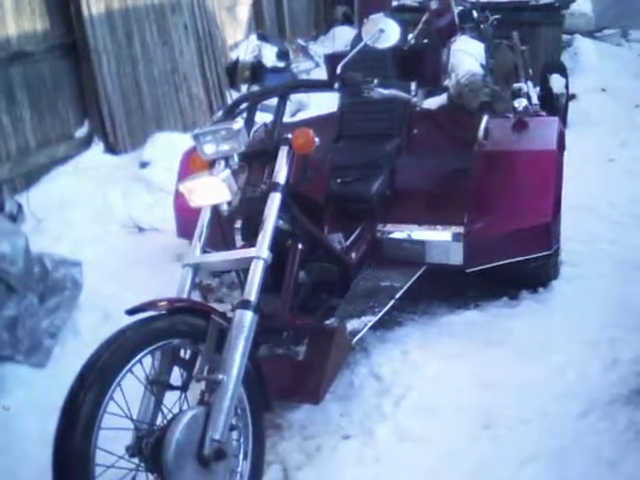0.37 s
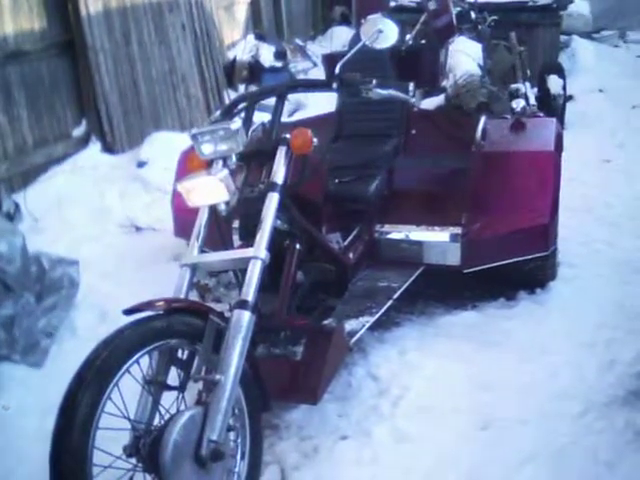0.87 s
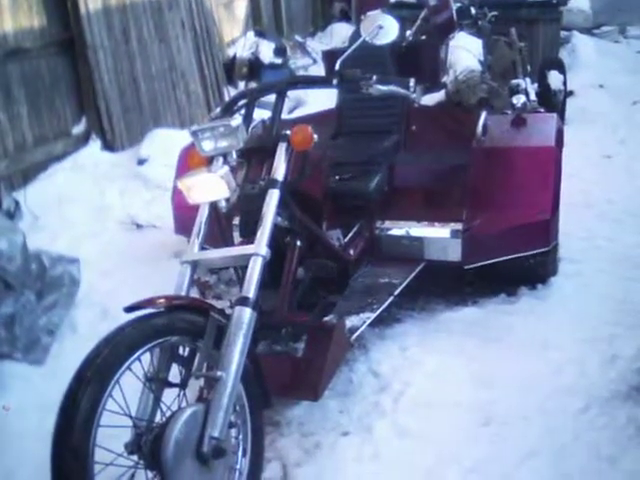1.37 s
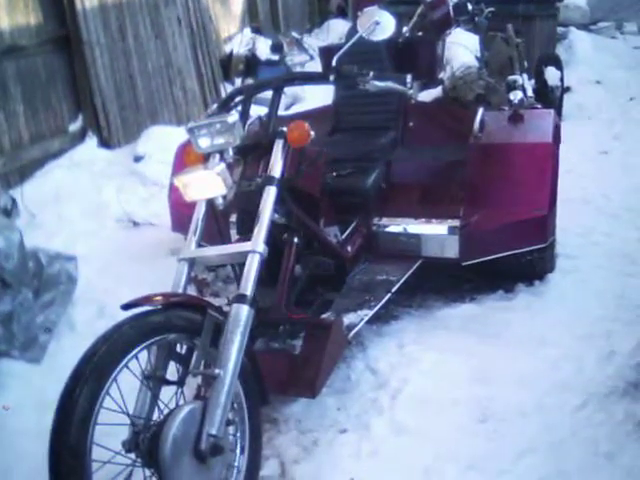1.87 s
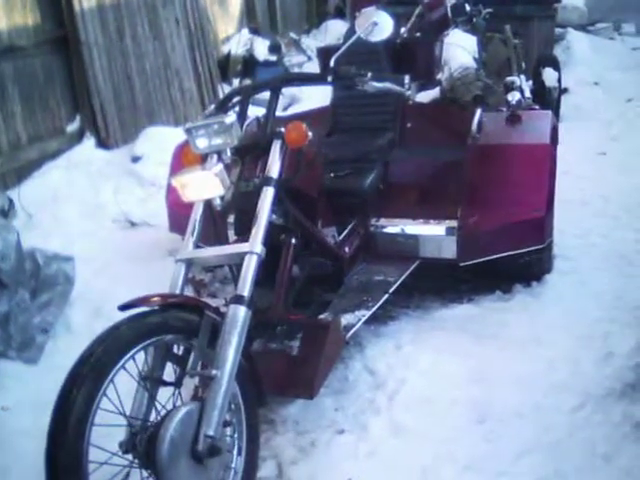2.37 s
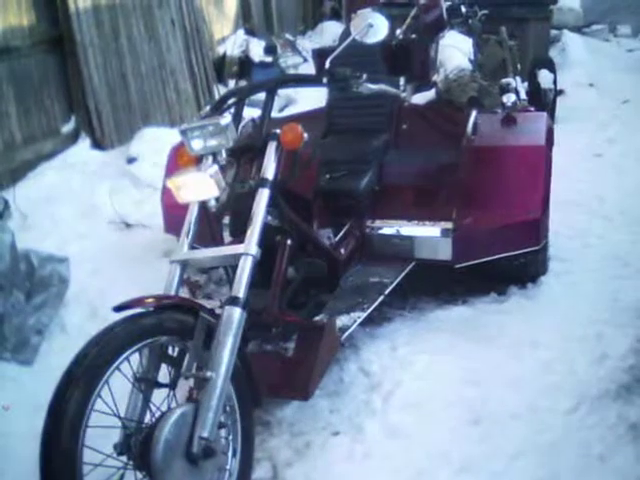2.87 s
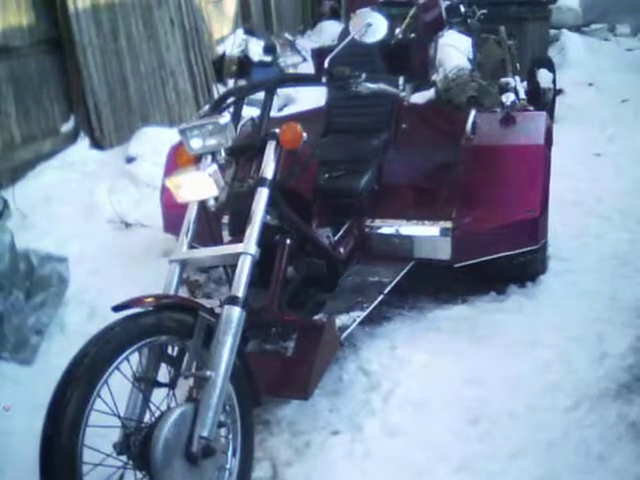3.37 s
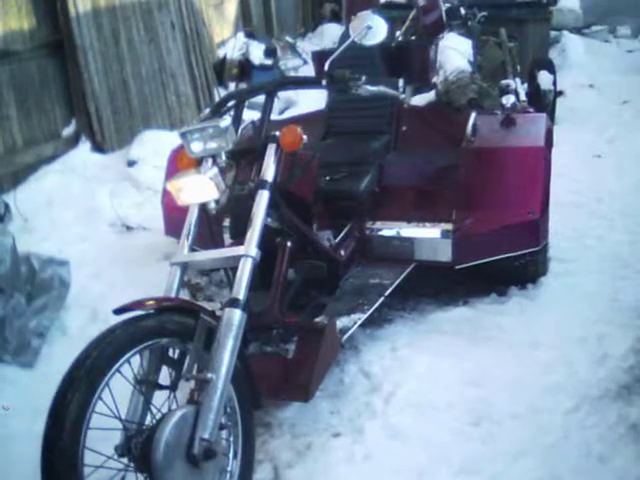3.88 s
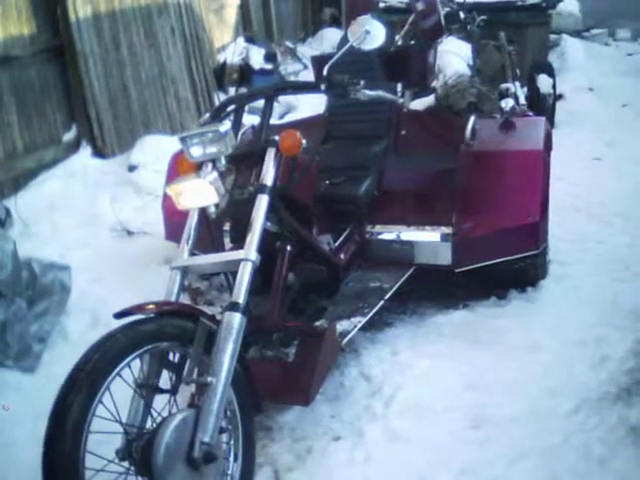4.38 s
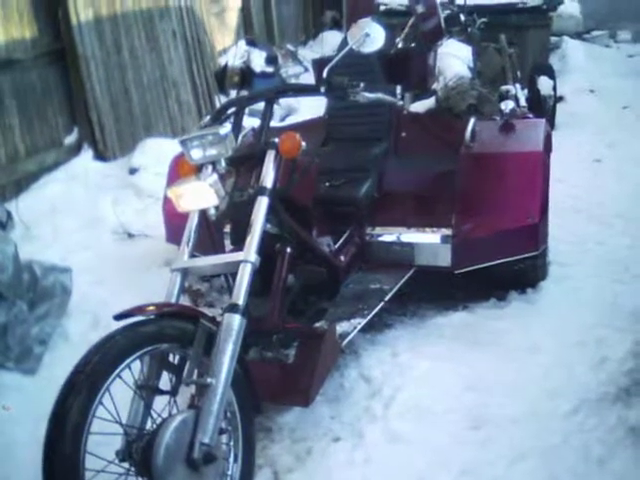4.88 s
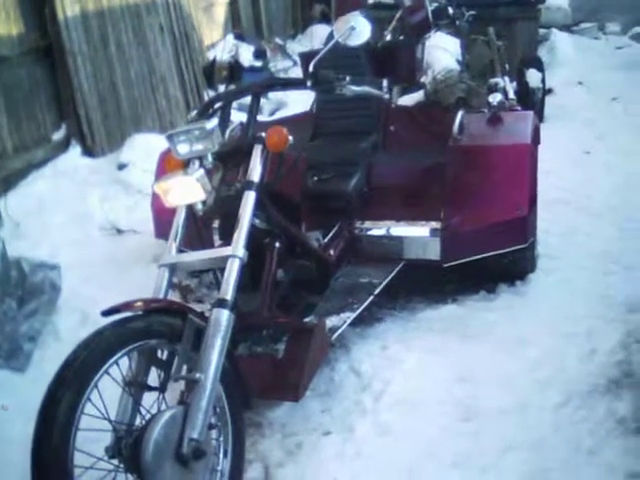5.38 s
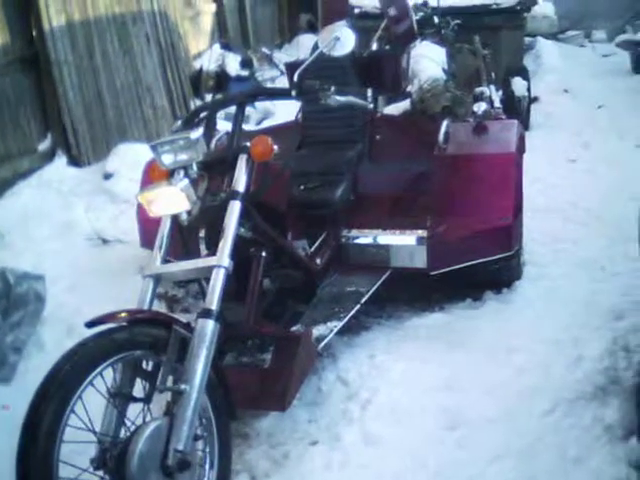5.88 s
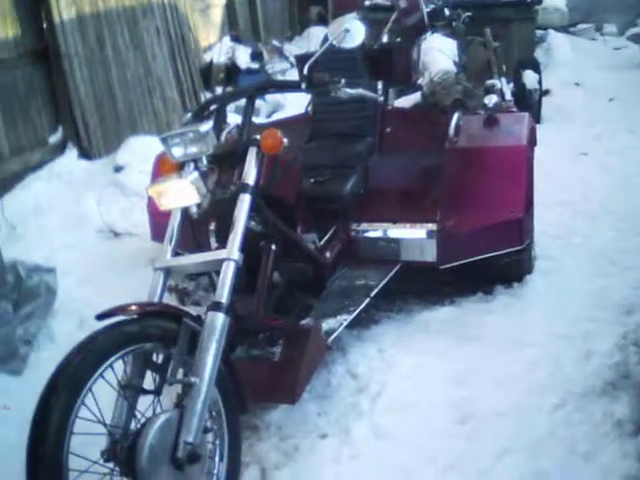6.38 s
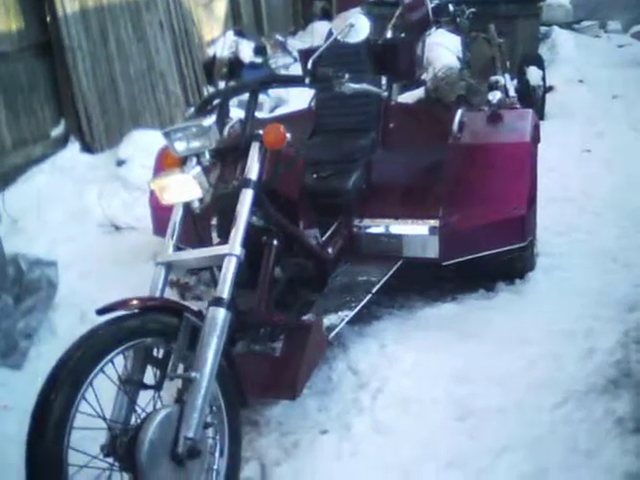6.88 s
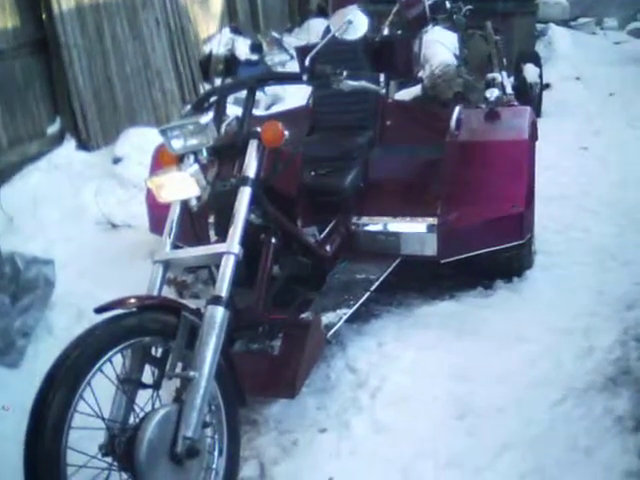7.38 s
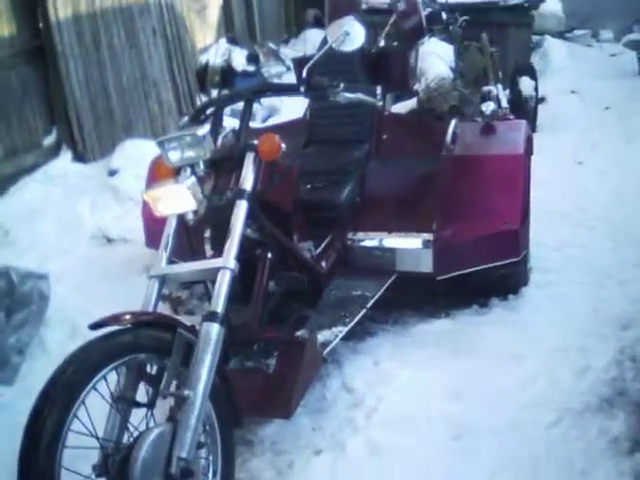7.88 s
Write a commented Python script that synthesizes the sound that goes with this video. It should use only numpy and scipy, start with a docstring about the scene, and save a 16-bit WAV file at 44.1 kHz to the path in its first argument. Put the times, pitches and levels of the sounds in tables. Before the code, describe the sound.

Deep even idle hum of a parked motor trike, ticking and hissing close by, with one brief handling bump and squeak.

```python
"""A four-cylinder air-cooled engine idles from the start in a snowy yard, steps from a handheld camera.
Exhaust tones on shaft orders and noisy thumps of uneven firing sag from a 63 Hz hum to about 57 Hz by 2.3 s.
Valve ticks and rubbing ring the block, hiss swells with each firing, thin tones hold steady throughout.
Hard firings ring the silencer from 1.9 to 6.9 s. Near 3.2 s a finger squeaks and the grip jolts the camera.
The hum climbs to 61 Hz by 6.1 s and sags again; a faint jolt follows at 7.8 s."""
import sys
import numpy as np
from scipy import signal
from scipy.io import wavfile
from scipy.ndimage import uniform_filter1d

SR = 44100
rng = np.random.default_rng(int(sys.argv[2]) if len(sys.argv) > 2 else 0)


def to_linear_factor(level_db):
    """Convert decibel levels (scalar or array-like) to linear amplitude factors."""
    exponent = np.asarray(level_db, float) / 20
    return 10 ** exponent


def store_pcm(level_fs):
    """Save levels as 16-bit WAV."""
    pcm = np.round(np.clip(level_fs, -1, 1) * 32767).astype(np.int16)
    wavfile.write(sys.argv[1], SR, np.atleast_2d(pcm).T)


N = 363384
T = np.arange(N) / SR  # s
MID_HZ = 59  # hum at which the speed-dependent levels hold


def evened(x):
    """Scales to rms 1."""
    return x / np.sqrt(np.mean(x ** 2) + 1e-20)


def coloured(x, points):
    """Causal minimum-phase filter through points of (Hz, dB): the phase follows from the log gain."""
    point_hz, point_db = np.transpose(points)
    bin_hz = abs(np.fft.fftfreq(2 ** 15, 1 / SR))
    gain_db = np.interp(np.log(bin_hz + 1), np.log(point_hz + 1), point_db)
    log_gain = np.log(to_linear_factor(gain_db))
    response = np.exp(np.conj(signal.hilbert(log_gain)))
    taps = np.fft.ifft(response).real[:2 ** 14]
    return signal.oaconvolve(x, taps)[:len(x)]


def resonate(x, hz, width_hz):
    """Resonance of peak gain 1: shifts hz down to zero, smooths with one pole, shifts back."""
    carrier = np.exp(2j * np.pi * np.cumsum(hz * np.ones(len(x))) / SR)
    pole = np.exp(-np.pi * width_hz / SR)
    return 2 * (carrier * signal.lfilter([1 - pole], [1, -pole], x / carrier)).real


def resonate_twice(x, hz, width_hz):
    """Two equal resonances in series: steeper skirts, slower onset."""
    return resonate(resonate(x, hz, width_hz), hz, width_hz)


def waver(points_per_s):
    """Slow random curve of rms 1: straight lines between normal draws."""
    count = round(T[-1] * 200)
    return evened(np.interp(T * points_per_s, np.arange(count), rng.standard_normal(count)))


# Idle speed. Each row: time in seconds, hum in Hz (four times the shaft speed).
IDLE_SPEED = [(0.0, 63.0), (0.3, 62.08), (0.6, 60.3), (0.9, 59.79), (1.3, 60.09), (1.9, 59.29), (2.3, 56.6),
              (2.6, 57.43), (3.2, 56.47), (3.45, 58.84), (3.8, 57.71), (4.1, 57.95), (4.6, 58.27),
              (5.2, 60.13), (5.7, 60.85), (6.1, 61.22), (6.5, 61.23), (7.05, 58.57), (7.6, 59.23),
              (8.24, 58.85)]


def hum_hz():
    """Hum frequency over time, four cycles per shaft turn."""
    return np.interp(T, *np.transpose(IDLE_SPEED))


# Hum level. Each row: time in seconds, level in dB.
HUM_LEVEL = [(0, -27.5), (.5, -27), (1.1, -28), (2, -27), (3.3, -29), (4, -28), (5.5, -28), (6.9, -27),
             (7.5, -29), (8.24, -28)]
# Much harder or weaker burns. Each row: centre in seconds, lift or drop of the hum in dB.
ODD_BURNS = [(.22, 3.8), (.42, 2.8), (.48, 2.8), (.54, 3.4), (.81, 3.3), (1.21, 3.1), (1.42, 2.5),
             (1.55, 2.8), (1.95, 2.5), (2.13, 3), (2.27, -4), (2.35, -5), (2.49, -5.7), (2.72, 3.4),
             (2.77, -5.6), (2.91, -4.7), (3.1, 3.6), (3.33, -4.3), (3.55, 3.5), (3.63, 3.3), (3.81, -5.9),
             (4.07, 3.6), (4.59, 3.6), (4.64, -5.3), (5.07, -9), (5.66, 3.6), (5.83, 3.3), (5.99, 3.5),
             (6.25, 4.1), (6.7, 3.3), (6.88, 3.9), (7.11, 3.2), (7.19, 3.2), (7.46, -8.3), (7.87, 3.6),
             (7.96, 3.8)]
# Weaker exhaust orders. Each row: multiple of the hum, level in dB re mean hum, polarity +-1.
WEAK_ORDERS = [(.75, -25, -1), (1.25, -24, 1), (1.5, -23, -1), (1.75, -24, -1), (2.25, -31, 1),
               (2.75, -20, 1), (3.25, -23, 1), (3.5, -31, -1), (3.75, -27, -1), (4, -29, -1),
               (4.5, -28, -1), (5, -38, -1), (5.5, -42, 1), (7, -42, -1)]
BURN_S = .02  # from centre to 1/e
OCTAVE_DB, OCTAVE_DB_PER_HZ = -41.5, -.6  # at MID_HZ, slope per Hz of hum
TENTH_DB, TENTH_DB_PER_HZ = -39.8, .3


def exhaust(shaft):
    """Sines on shaft orders; all but hum and octave leave the pipe shifted by a fifth of a cycle."""
    def tone(multiple, shift):
        return np.sqrt(2) * np.cos(2 * np.pi * (4 * multiple * shaft + shift))

    hum_db = np.interp(T, *np.transpose(HUM_LEVEL))
    burn_db = sum(db * np.exp(-((T - s) / BURN_S) ** 2) for s, db in ODD_BURNS)
    fast_hz = hum_hz() - MID_HZ
    out = to_linear_factor(hum_db + burn_db) * tone(1, 0)
    out += to_linear_factor(OCTAVE_DB + OCTAVE_DB_PER_HZ * fast_hz + 1.1 * waver(15)) * tone(2, 0)
    out += to_linear_factor(TENTH_DB + TENTH_DB_PER_HZ * fast_hz + 1.1 * waver(17)) * tone(5 / 2, 1 / 5)
    for multiple, db, polarity in WEAK_ORDERS:
        level = to_linear_factor(np.mean(hum_db) + db + 0.47 * waver(9))
        out += polarity * level * tone(multiple, 1 / 5)
    return out


def firings(shaft, decay):
    """Decaying puff at each firing, two a turn, of random strength; decay in firing intervals."""
    strength_db = 2.0 * rng.standard_normal(400) + np.resize([1.5, -1.5], 400)
    strength = to_linear_factor(strength_db)[(2 * shaft).astype(int)]
    return strength * np.exp(-(2 * shaft % 1) / decay)


# Uneven firings. Each row: share of the turn, spread of the thump in dB, relative.
UNEVEN_FIRINGS = [(.3, -2), (0.801, -17)]
# Rumble filter. Each row: frequency in Hz, density in dB per Hz, relative.
RUMBLE_COLOUR = [(5, -9), (12, -3), (28, -4.5), (45, -2.5), (72, 1), (100, -11.5), (130, -9), (165, -2.5),
                 (230, -4.5), (290, -14), (330, -15), (420, -18.5), (600, -24.5), (1000, -24.5),
                 (2000, -61.5)]
RUMBLE_DB, RUMBLE_DB_PER_HZ = -39, -.4  # at MID_HZ; firings get more uneven as the speed sags


def rumble(shaft):
    """Each firing burns harder or softer than the mean: a thump of either sign, over gas noise."""
    thumps = np.zeros(N)
    for share, db in UNEVEN_FIRINGS:
        at = np.flatnonzero(np.diff(np.floor(shaft - share)))
        thumps[at] += to_linear_factor(db) * rng.standard_normal(200)[:len(at)]
    silencer = signal.butter(2, 300, fs=SR, output="sos")  # rounds the thumps off
    thumps = signal.sosfilt(silencer, thumps)
    gas = (0.024 + 0.016 * firings(shaft + 0.041, 0.31)) * rng.standard_normal(N)
    level_db = RUMBLE_DB + RUMBLE_DB_PER_HZ * (hum_hz() - MID_HZ)
    return to_linear_factor(level_db) * evened(coloured(thumps + gas, RUMBLE_COLOUR))


# Single hard firings. Each row: time in seconds, peak in dB.
HARD_FIRINGS = [(1.865, -31), (2.83, -27), (3.246, -30), (4.001, -29), (4.739, -36), (5.547, -32.5),
                (6.925, -33)]


def pops():
    """A hard firing kicks the silencer, which rings at 185 Hz for a few cycles."""
    kicks = np.zeros(N)
    for s, db in HARD_FIRINGS:
        kicks[round(s * SR)] = to_linear_factor(db)
    ring = resonate_twice(kicks, 185, 65)
    return ring * kicks.max() / abs(ring).max()


# Valve ticks. Each row: share of the shaft turn, mean strength in dB, relative.
VALVE_TICKS = [(.16, -2), (.42, -17), (.49, -1.5), (0.622, 1), (0.842, -5), (0.981, -9)]
# Modes of block and tinware. Each row: frequency in Hz, width per pass in Hz, level in dB, relative.
BLOCK_MODES = [(499, 117, -4), (701, 81, -8), (793, 58, -0.5), (864.5, 60, 1.5), (929.5, 23, -1.5),
               (967, 55, -2), (1133, 45, -6.5), (1219, 85, -8), (1428, 225, -7), (2110, 90, -18),
               (2350, 98, -7), (2554, 110, -10.5), (2692, 65, -14), (2820, 140, -15), (4434, 350, -17),
               (9100, 790, -24)]
BLOCK_DB = -53.5  # rms, before the treble curve


def block(shaft):
    """Valve ticks (a sharp blow and a short rattle) and steady rubbing ring the metal."""
    beat, blows = 1.18 * np.ones(N), np.zeros(N)
    for share, db in VALVE_TICKS:
        turns = shaft - share + 1
        size = to_linear_factor(db + 1.8 * rng.standard_normal(200))[turns.astype(int)]
        beat += size * np.exp(-(turns % 1) / .04)
        blows[1:] += 15 * size[1:] * np.diff(np.floor(turns))
    drive = beat * rng.standard_normal(N) + uniform_filter1d(blows, 12)
    ring = np.zeros(N)
    for k, (hz, width_hz, db) in enumerate(BLOCK_MODES):
        level = to_linear_factor(db + .5 * waver(2.82))
        ring += (-1) ** k * level * resonate_twice(drive, hz, width_hz)  # neighbours in opposite sign
    return to_linear_factor(BLOCK_DB) * evened(ring)


# Hiss filter. Each row: frequency in Hz, density in dB per Hz, relative.
HISS_COLOUR = [(590, -28.5), (1000, -8), (1120, -8), (1490, -6), (1810, -9.5), (2210, -10.5), (2430, -8.5),
               (2780, -13.5), (3120, -14), (4490, -14.5), (4930, -14), (5950, -11), (8930, -12.5),
               (11000, -26), (12100, -54), (15700, -78), (22000, -120)]
HISS_DB = -56.5  # rms, before the treble curve


def hiss(shaft):
    """Cooling air and intake: filtered noise that swells with each firing."""
    swell = uniform_filter1d(firings(shaft + 0.11, 0.41), 60)
    drive = (1.8 + swell) * to_linear_factor(.5 * waver(3.6)) * rng.standard_normal(N)
    return to_linear_factor(HISS_DB) * evened(coloured(drive, HISS_COLOUR))


# Treble level. Each row: time in seconds, gain in dB.
TREBLE_LEVEL = [(0, .6), (1.5, .8), (2.5, -.9), (3.5, 0), (6, .5), (7.3, -.4), (8.24, .5)]


def clatter(shaft):
    """Block and hiss together under one slow level curve."""
    return to_linear_factor(np.interp(T, *np.transpose(TREBLE_LEVEL))) * (block(shaft) + hiss(shaft))


# Grip jolts. Each row: centre in seconds, wobble peak in dB, wobble 1/e time in seconds,
# scuff level in dB before its filter.
GRIP_JOLTS = [(3.175, -25.5, 0.021, -47.5), (3.33, -37, .03, -75), (7.82, -40, .045, -75)]
# Finger slips. Each row: centre in seconds, pitch in Hz, level at the centre in dB.
FINGER_SLIPS = [(3.162, 7300, -55), (3.179, 7900, -52), (3.195, 7950, -46)]
SLIP_S = .005  # from centre to 1/e


def handling():
    """Grip jolts: 15 Hz wobble, short scuff before it; a finger slip squeaks as narrow noise."""
    scuff_colour = [(300, 6), (1500, 9), (3500, 0.5), (5000, -12), (9000, -16), (11000, -40)]  # Hz, dB
    out = np.zeros(N)
    for s, push_db, length_s, scuff_db in GRIP_JOLTS:
        wobble = np.exp(-((T - s) / length_s) ** 2) * np.cos(2 * np.pi * 15 * (T - s))
        out -= to_linear_factor(push_db) * wobble
        scuff = np.exp(-((T - s + 0.03) / .011) ** 2) * rng.standard_normal(N)
        out += to_linear_factor(scuff_db) * coloured(scuff, scuff_colour)
    for s, hz, db in FINGER_SLIPS:
        fuzz = evened(resonate_twice(rng.standard_normal(N), hz, 700))
        out += to_linear_factor(db) * np.exp(-((T - s) / SLIP_S) ** 2) * fuzz
    return out


# Tones of the camera. Each row: frequency in Hz, rms level in dB.
CAMERA_TONES = [(6100, -78), (7001, -83), (9600, -84)]


def whine():
    """Thin steady sines of the camera itself."""
    return sum(np.sqrt(2) * to_linear_factor(db) * np.sin(2 * np.pi * hz * T) for hz, db in CAMERA_TONES)


def scene():
    """Engine, hand and camera tones; one shaft angle, in turns, drives the engine sounds."""
    start_turn = .0475
    shaft = start_turn + np.cumsum(hum_hz()) / 4 / SR
    engine = exhaust(shaft) + rumble(shaft) + pops() + clatter(shaft)
    return (engine + handling() + whine())[None]


def band_limit(x):
    """A steep low-pass at the top of the band."""
    return signal.sosfilt(signal.butter(12, 12240, fs=SR, output="sos"), x)


def record(dry):
    """The converter adds a small steady offset."""
    offset = -.009  # of full scale
    return band_limit(dry + offset)


dry = scene()
out = record(dry)
store_pcm(out)
```